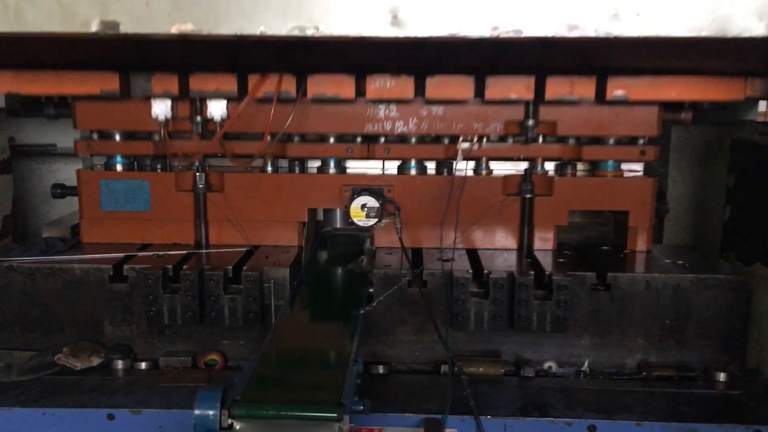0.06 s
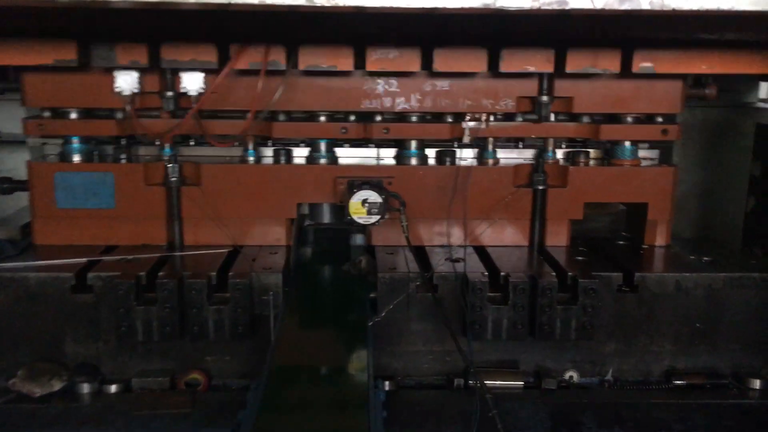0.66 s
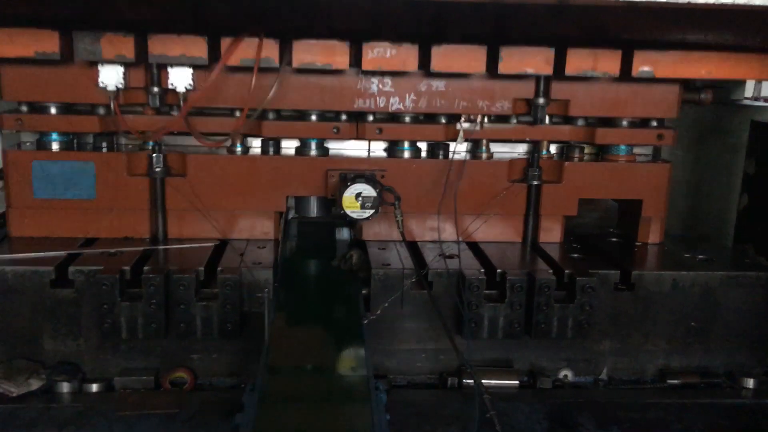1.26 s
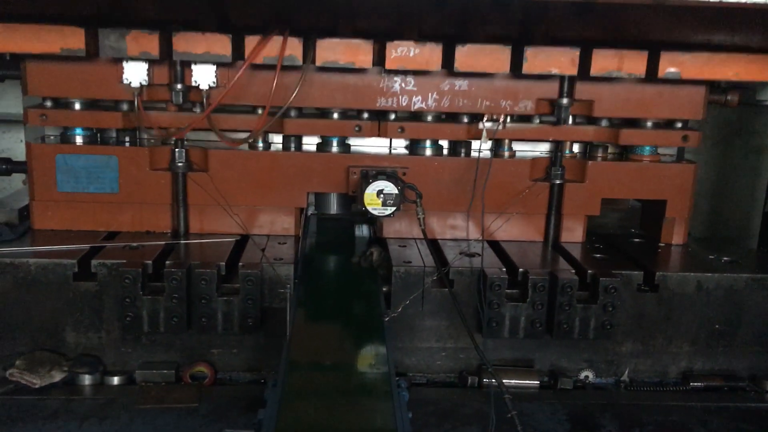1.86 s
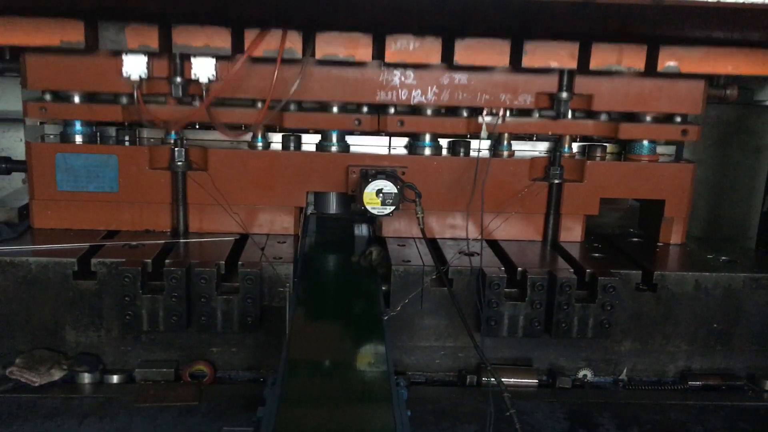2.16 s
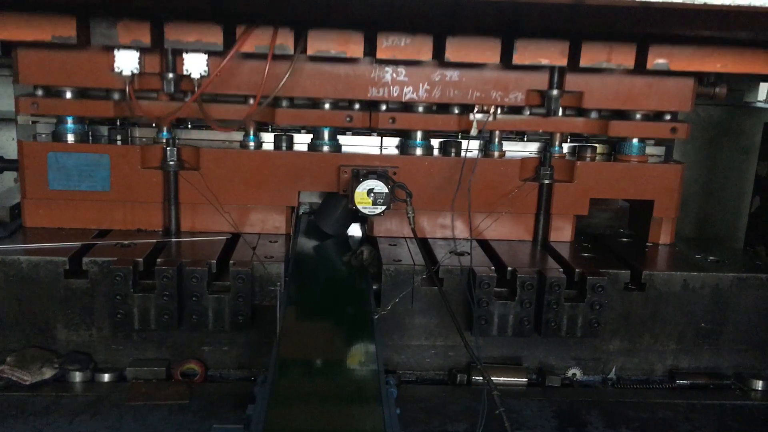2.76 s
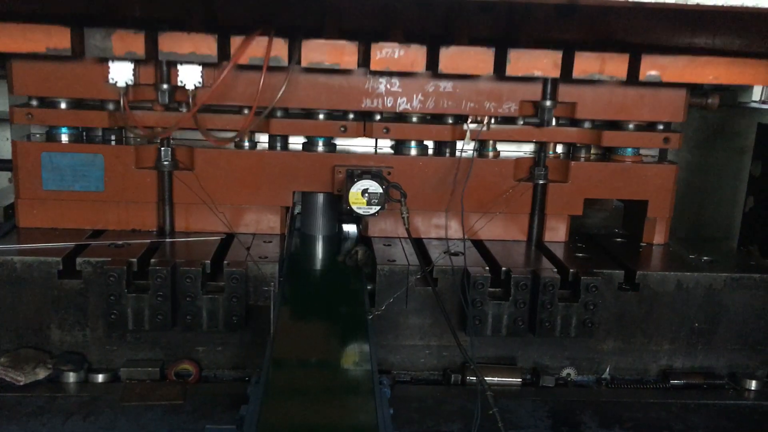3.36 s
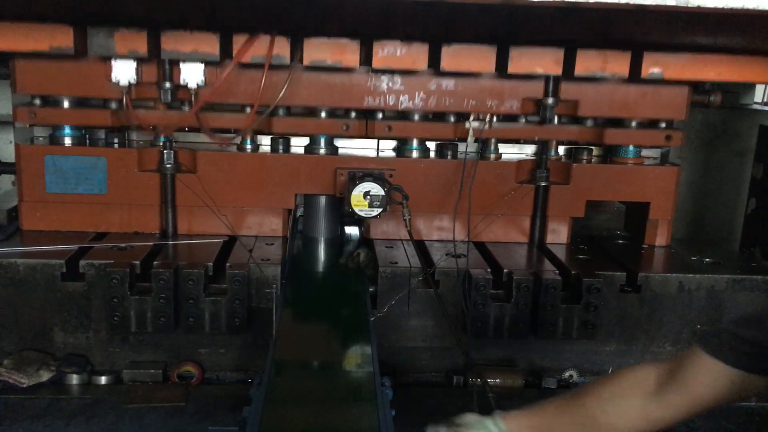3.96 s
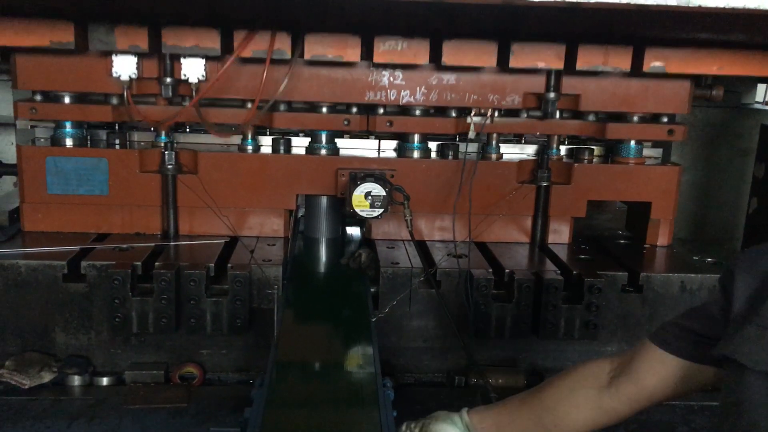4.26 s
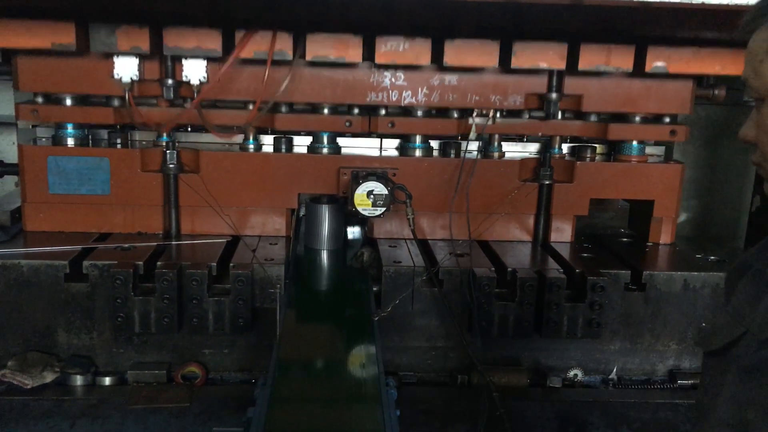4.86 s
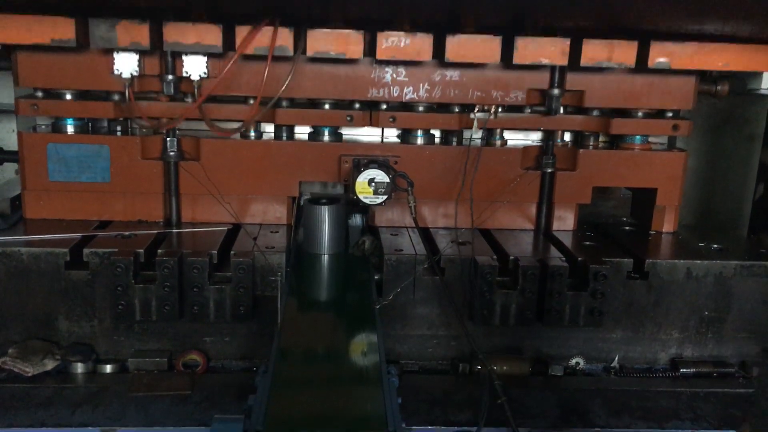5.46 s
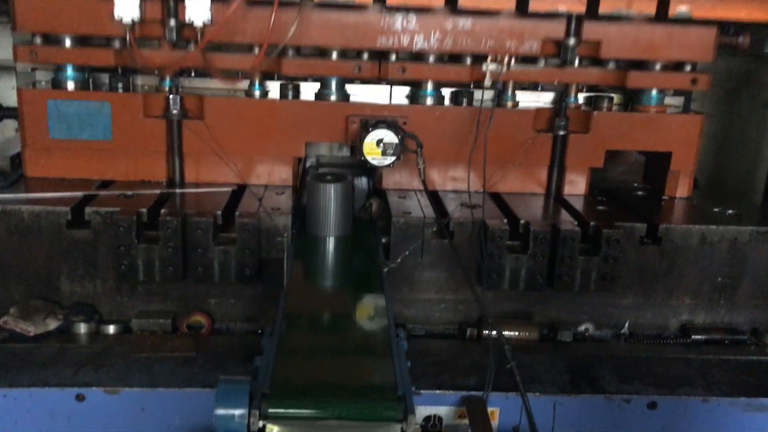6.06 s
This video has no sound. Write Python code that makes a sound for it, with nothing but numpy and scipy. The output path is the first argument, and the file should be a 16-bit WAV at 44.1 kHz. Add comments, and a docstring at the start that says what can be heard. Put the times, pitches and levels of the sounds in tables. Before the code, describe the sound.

A stamping press pounds fast and evenly, with thuds, steel clanks and bursts of hissing air over factory machinery rumble.

```python
"""A factory hall, close in front of the die of a stamping press running at about 230 strokes a minute.
In every stroke the frame groans under rising load, the punches squeak through the strip, the die closes
in a quick run of thuds and steel clanks, and a jet of air clears the part. Frame and die ring in their
normal modes, and the hall reverberates between strokes, over the rumble of the machinery."""
import sys
import numpy as np
from scipy import signal
from scipy.fft import rfft, irfft
from scipy.io import wavfile

SR = 44100
rng = np.random.default_rng(int(sys.argv[2]) if len(sys.argv) > 2 else 0)


def to_wav(sig):
    """Store sig (one row per channel, or 1-D mono) as 16-bit WAV at the path in sys.argv[1].

    Samples outside -1..1 are clipped; the rate is SR.
    """
    pcm = np.clip(np.atleast_2d(sig), -1, 1) * 32767
    pcm = np.round(pcm).astype(np.int16)
    wavfile.write(sys.argv[1], SR, pcm.T)  # frames by channels


N = 274743
TIME = np.arange(N) / SR
FREQ = np.arange(N // 2 + 1) * SR / N
FIRST_CUT_S, PERIOD_S = .1113, .259565  # moments within a stroke count from the cut


def clanks(early_db=2, settle_s=.9, contact_s=.00021):
    """Impact noise: harder contact of steel on steel is brighter; the first strokes hit hardest."""
    steel_spectrum = rfft(steel_vibration())
    t, bursts = TIME[:SR // 8], 0
    for start_s, db, bright_hz, t60_s in blows() + punches() + rattles():
        envelope = undb(db) * (1 - np.exp(-t / contact_s)) * fade(t, t60_s)
        vibration = irfft(steel_spectrum / np.sqrt(1 + (FREQ / bright_hz) ** 2), N)
        bursts = bursts + every_stroke(envelope, start_s, scatter_db=1.87) * vibration
    return bursts * undb(early_db * np.exp(-TIME / settle_s))


def steel_vibration(alike_hz=1320):
    """Densely overlapping modes merge into noise: its lows repeat each turn, its highs are ever new."""
    # spectrum of struck steel: frequency_hz, relative_db
    steel_spectrum = [(150, 7), (350, 6), (480, -0.5), (650, -3), (900, -0.5), (1150, -4), (2100, -7),
                      (3000, -9.5), (4100, -8.5), (5500, -16.5), (9000, -28.5), (15000, -26)]
    since_cut_s = (TIME - FIRST_CUT_S) % PERIOD_S
    repeating = rfft(rng.standard_normal(N)[(since_cut_s * SR).astype(int)])
    fresh = rfft(rng.standard_normal(N))
    share = 1 / (1 + (FREQ / alike_hz) ** 2)
    noise = irfft(repeating * np.sqrt(share) + fresh * np.sqrt(1 - share), N)
    return level(colour(noise, steel_spectrum), 0)


def blows(crack_t60_s=.024, chatter_db=-6.8, chatter_hz=2200, chatter_t60_s=.13):
    """Two-stage decay: each main impact is a short crack and a weaker, longer chatter."""
    # the stripper lands, the punches cut, the die bottoms: start_s, level_db, brightness_hz
    impacts = [(-.0205, -17.5, 2900), (.0011, -9.3, 4400), (.035, -10.5, 1450)]
    rows = []
    for start_s, db, bright_hz in impacts:
        rows.append((start_s, db, bright_hz, crack_t60_s))
        rows.append((start_s, db + chatter_db, chatter_hz, chatter_t60_s))
    return rows


def punches(first_s=.0079, gap_s=.007, db=-19, bright_hz=1430, t60_s=.091):
    """Staggered breakthrough: the later punches give three like impacts, one after another."""
    return [(first_s + k * gap_s, db, bright_hz, t60_s) for k in range(3)]


def rattles(first_s=.058, gap_s=.027, db=-24.5, step_db=-3.5, bright_hz=1690, t60_s=.24):
    """Inelastic rebound: loose steel rattles as the die opens, weaker each time."""
    return [(first_s + k * gap_s, db + k * step_db, bright_hz, t60_s) for k in range(3)]


def thuds():
    """Damped oscillation: each blow heaves the bed briefly; heavier, softer contacts sound lower."""
    # heavy contacts on the bed: start_s, level_db, pitch_hz, swell_cycles
    contacts = [(-.0251, -15.5, 285, 2.9), (-.0094, -9.5, 191, 0.76), (.0001, -14, 110.6, 1.52),
                (0.0251, -12.5, 254.2, 2.93), (0.035, -14, 85.4, .55), (0.049, -9.5, 196, 0.7),
                (0.0739, -15.5, 169, 0.89)]
    t, out = TIME[:SR // 8], 0
    for start_s, db, hz, swell_cycles in contacts:
        rise = t * hz / swell_cycles
        heave = rise ** 2 * np.exp(2 * (1 - rise)) * np.sin(2 * np.pi * hz * t)
        out = out + every_stroke(undb(db) * heave, start_s, scatter_db=1.74)
    return out


def frame_groan(start_s=-.051, end_s=.11, attack_s=.01, release_s=.074):
    """Stress tunes the frame: its pitch climbs as the load comes on and sags once the strip is cut."""
    slack_hz, loaded_hz, sag_hz = 168, 409, 80
    load_at_s, load_rise_s, sag_s = -.0163, .0046, .0163
    t = start_s + TIME[:int((end_s - start_s) * SR)]
    load = (1 + np.tanh((t - load_at_s) / (2 * load_rise_s))) / 2
    sag = 1 - np.exp(-np.maximum(t, 0) / sag_s)
    hz = slack_hz + (loaded_hz - slack_hz) * load - sag_hz * sag
    swell = np.clip(np.minimum((t - start_s) / attack_s, (end_s - t) / release_s), 0, 1)
    return steel_tone(start_s, hz, undb(-18) * swell, waver=.003, early_sharp=.0063)


def punch_squeaks():
    """Friction tones: the punches squeak into and out of the strip, each in a linear glide."""
    # sliding contacts: start_s, length_s, pitch_hz, glide_hz_per_s, level_db
    slides = [(-.0114, 0.0304, 708, 10500, -19.5), (.036, 0.0171, 634.5, -12000, -12)]
    out = 0
    for start_s, length_s, centre_hz, glide, db in slides:
        t = TIME[:int(length_s * SR)]
        hz = centre_hz + glide * (t - length_s / 2)
        swell = undb(db) * np.sin(np.pi * t / length_s)
        out = out + steel_tone(start_s, hz, swell, waver=.016, early_sharp=.076)
    return out


def steel_tone(start_s, hz, envelope, waver, early_sharp, overtone_db=-19, settle_s=.99):
    """Stressed steel sings a fundamental and its octave, a little sharp in the first, harder strokes."""
    out = np.zeros(N)
    for at_s in strokes(start_s):
        detune = 1 + waver * rng.standard_normal() + early_sharp * np.exp(-at_s / settle_s)
        phase = 2 * np.pi * np.cumsum(hz * detune) / SR
        add(out, at_s, envelope * (np.sin(phase) + undb(overtone_db) * np.sin(2 * phase)))
    return out


def air_blast(crack_s=.0015, open_s=.012, shut_s=.046, leak_db=-15, fill_s=.023, empty_t60_s=.33):
    """Turbulent jet noise: a valve opens once a turn and air hisses out, brightest at full flow."""
    # spectrum of the jet: frequency_hz, relative_db
    jet_spectrum = [(300, 8.5), (700, 7), (1700, 2), (2500, -1.5), (4000, -4), (6000, -7), (9000, -5.5),
                    (12000, -10.5), (15500, -16.5)]
    edge_hz, slack_db, full_db = 11500, -4, 1.5  # treble above the edge, at no flow and full flow
    # the valve cracks open, opens fully, shuts, and the pipe empties
    t = crack_s + TIME[:SR // 4]
    pressure = undb(leak_db) + 1 - np.exp(-np.maximum(t - open_s, 0) / fill_s)
    emptying = fade(np.maximum(t - shut_s, 0), empty_t60_s)
    flow = every_stroke(pressure * emptying, crack_s, scatter_db=.2)
    hiss = colour(rng.standard_normal(N), jet_spectrum)
    body = irfft(rfft(hiss) / (1 + (FREQ / edge_hz) ** 10), N)
    treble = (hiss - body) * undb(slack_db + (full_db - slack_db) * flow)
    return flow * (body + treble)


def frame_ring(load_peak_s=.0293, build_s=.041):
    """Free vibration: the peak of the load sets the heavy frame humming on into the next strokes."""
    # slow modes of frame and bed: pitch_hz, relative_db, t60_s
    frame_modes = [(73, -5, 0.6), (82.2, -28, 0.4), (97.2, -4, 1.6), (120.7, -5, 1.4), (126, -27, 0.24),
                   (148, 5.5, 1.57), (165, -1.5, 1.77), (177.6, -5.5, 0.83), (227.5, -0.5, 2),
                   (251.3, -0.5, 0.42), (256, -1, 1.1), (313.4, -8.5, 1.8), (342, -13, 0.13),
                   (338.8, -9, 1.2), (359, -1.5, 5.1), (373, 1, 1.2), (404.8, -9, 2.4), (427, -4.5, 1.9),
                   (522, -10, 1.1), (627, -5.5, 1.9), (778, -13, 1.64)]
    kicks = every_stroke(np.ones(1), load_peak_s, scatter_db=2.1)
    build_up = 1 - np.exp(-TIME[:SR] / build_s)
    return through(kicks, ringing(frame_modes) * build_up)


def die_ring(drive, t60_s=.4):
    """Resonance: the die rings where the drive meets its natural frequencies."""
    # modes of the die: pitch_hz, relative_db
    die_modes = [(545, -15), (595, 2), (656, -4), (705, -30), (762, -28), (792, -11), (875, -30),
                 (908, -17), (1097, 2), (1314, 3.5), (1647, -32), (1736, 0.5), (1929, 6), (2513, 3),
                 (3110, 3), (3984, 2), (5477, 13), (6928, 0), (8072, -9)]
    return through(drive, ringing([(hz, db, t60_s) for hz, db in die_modes]))


def hall(x, low_t60_s=1.0, high_t60_s=.29, split_hz=3500, treble_db=8, build_s=.034):
    """Reverberation: a diffuse field builds up in the hall and decays, the treble first."""
    t = TIME[:SR]
    low = signal.sosfilt(signal.butter(2, split_hz, fs=SR, output="sos"), rng.standard_normal(SR))
    high = signal.sosfilt(signal.butter(2, split_hz, "high", fs=SR, output="sos"), rng.standard_normal(SR))
    tail = low * fade(t, low_t60_s) + undb(treble_db) * high * fade(t, high_t60_s)
    return through(x, tail * (1 - np.exp(-t / build_s)))


def machinery_rumble():
    """Stationary broadband noise: the machinery rumbles, strongest at low frequencies."""
    # spectrum of the machinery: frequency_hz, relative_db
    rumble_spectrum = [(25, -22), (50, -17), (68, 6), (110, -8), (240, 12.5), (360, 5.5), (480, 7),
                       (650, 3), (1000, 1.5), (2000, -9), (4000, -15.5), (8000, -18.5), (15000, -26.5)]
    return colour(rng.standard_normal(N), rumble_spectrum)


def narrow_dips(x):
    """Notch filtering: narrow dips thin the deepest thud and soften the groan near 380 Hz."""
    # dips in the low and middle range: centre_hz, width_hz, gain_db
    dips = [(56, 7.2, -11), (84.4, 3.4, -1), (208.7, 5.7, -10), (280.5, 2.9, -12), (379, 13, -4),
            (470, 40, -1), (940, 16, -6)]
    return bumps(x, dips)


def strokes(moment_s):
    """Periodic motion: the times at which the crank passes one moment of its turn."""
    return np.arange((FIRST_CUT_S + moment_s) % PERIOD_S, N / SR, PERIOD_S)


def every_stroke(sound, moment_s, scatter_db):
    """A pulse train: one sound at the same moment of each turn, never quite equally loud."""
    out = np.zeros(N)
    for start_s in strokes(moment_s):
        add(out, start_s, sound * undb(scatter_db * rng.standard_normal()))
    return out


def add(out, start_s, sound):
    """Superpose a short sound at a given time."""
    part = out[int(start_s * SR):][:len(sound)]
    part += sound[:len(part)]


def undb(db):
    """Decibels to amplitude ratio."""
    return 10 ** (np.asarray(db) / 20)


def level(x, db):
    """Set the rms level."""
    return x * undb(db) / np.sqrt(np.mean(x ** 2))


def fade(t, t60_s):
    """Exponential decay, by 60 dB in t60_s."""
    return np.exp(-np.log(1000) * t / t60_s)


def ringing(modes):
    """Impulse response as a sum of damped modes."""
    t = TIME[:SR]
    return sum(undb(db) * fade(t, t60_s) * np.sin(2 * np.pi * hz * t) for hz, db, t60_s in modes)


def through(x, response):
    """Circular convolution, so that strokes are already ringing at the start."""
    return irfft(rfft(x) * rfft(response, N), N)


def colour(x, points):
    """Filter by a spectral envelope of (frequency_hz, gain_db) points."""
    hz, db = np.transpose(points)
    gain_db = np.interp(np.log(FREQ + 1), np.log(hz), db)
    return irfft(rfft(x) * undb(gain_db), N)


def bumps(x, bands):
    """Filter by bell-shaped peaks and dips."""
    gain_db = sum(db / (1 + ((FREQ - hz) / width_hz) ** 2) for hz, width_hz, db in bands)
    return irfft(rfft(x) * undb(gain_db), N)


def scene():
    """Excitation and response: one crank drives every stroke; frame, die and hall answer."""
    steel, air = clanks(), level(air_blast(), -25.5)
    groan, squeaks = frame_groan(), punch_squeaks()
    die = level(die_ring(steel + undb(-9) * air), -34.5)
    # the low groan stays close to the frame and reaches the hall weakly
    radiated = steel + undb(-13.5) * groan + undb(-7.5) * (air + squeaks)
    echo = level(hall(radiated), -28.5)
    rumble = level(machinery_rumble(), -27.5)
    press = thuds() + groan + squeaks + steel + air + level(frame_ring(), -25) + die
    return narrow_dips(press + echo + rumble)[None]


def record(dry, low_cut_hz=58, top_hz=15750, ceiling=.72):
    """Band limiting and saturation: the microphone notches the treble, cuts both ends, rounds peaks."""
    # colour of the microphone port: centre_hz, width_hz, gain_db
    port_bands = [(4870, 200, -6), (5500, 280, 0.5), (10400, 280, -6.5), (11500, 460, 2), (12150, 340, -3)]
    low_cut = signal.butter(5, low_cut_hz, "high", fs=SR, output="sos")
    top_cut = signal.ellip(10, .2, 80, top_hz, fs=SR, output="sos")
    heard = signal.sosfilt(low_cut, bumps(dry, port_bands))
    rounded = heard / (1 + (heard / ceiling) ** 6) ** (1 / 6)
    return signal.sosfilt(top_cut, rounded)


dry = scene()
out = record(dry)
to_wav(out)
```